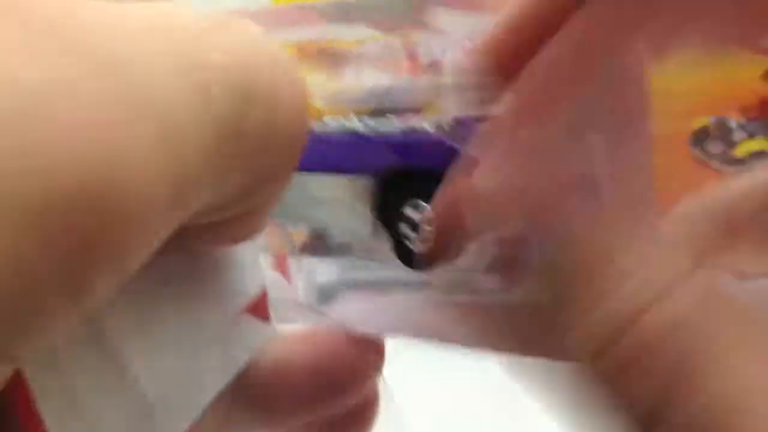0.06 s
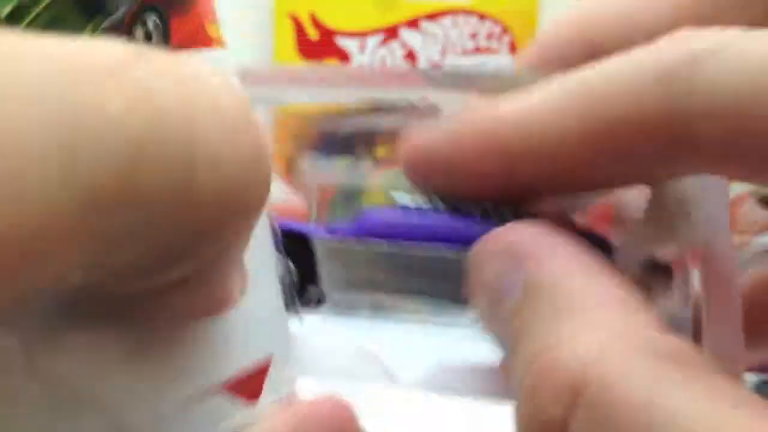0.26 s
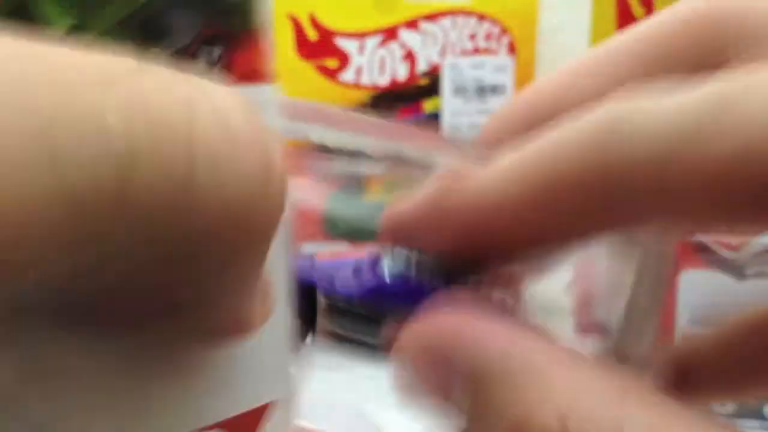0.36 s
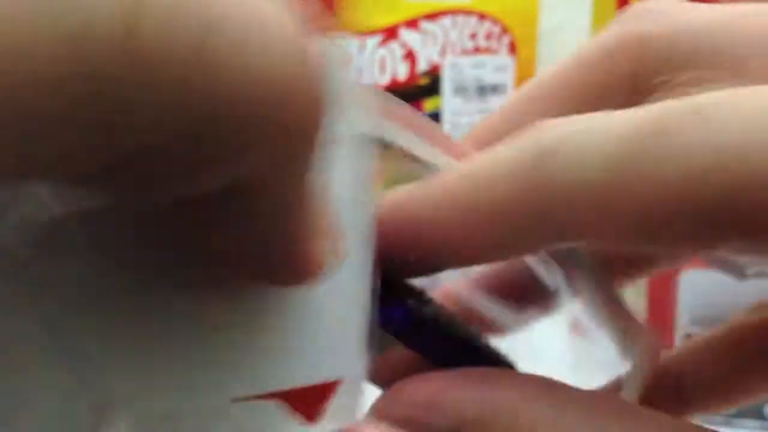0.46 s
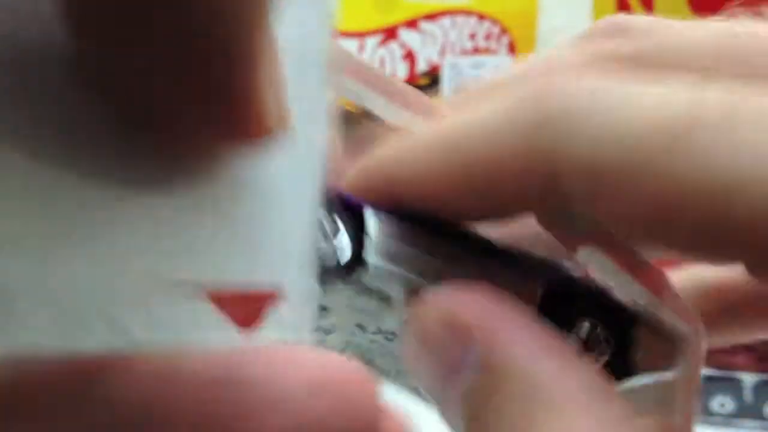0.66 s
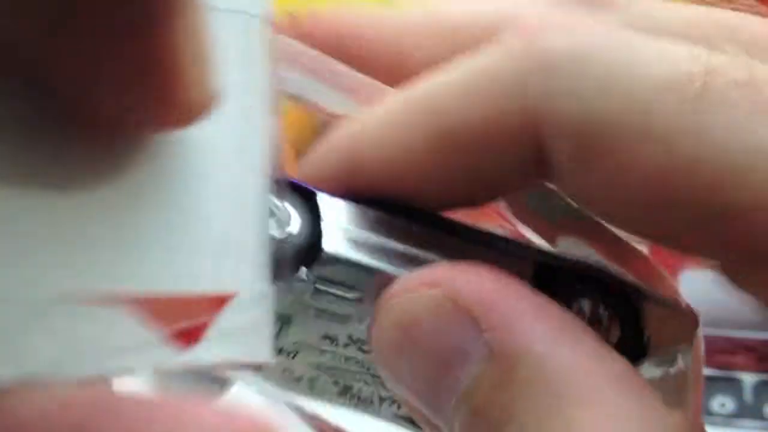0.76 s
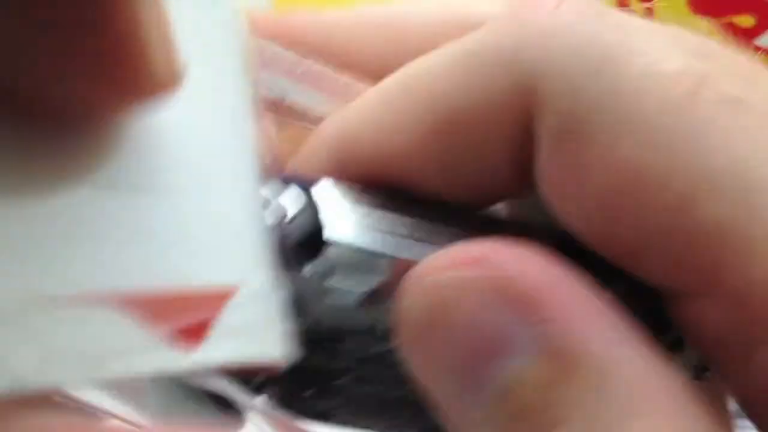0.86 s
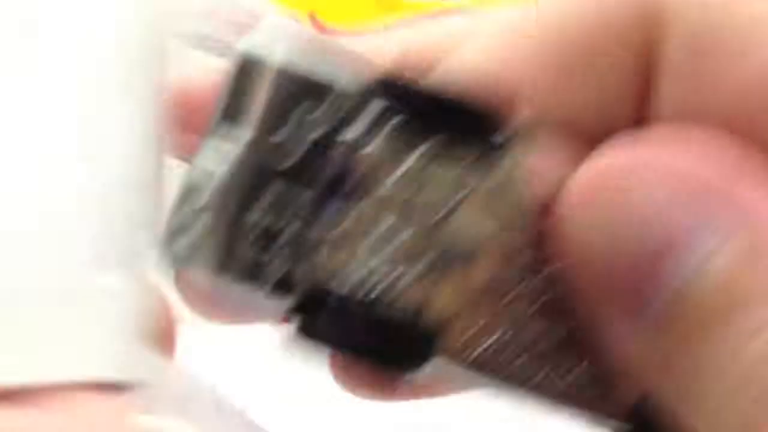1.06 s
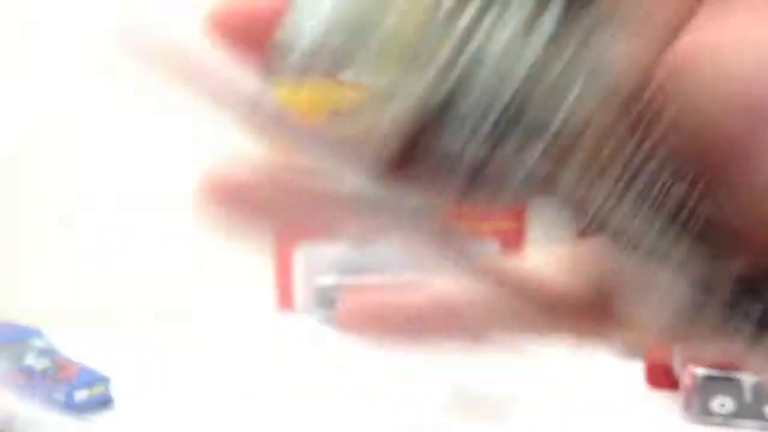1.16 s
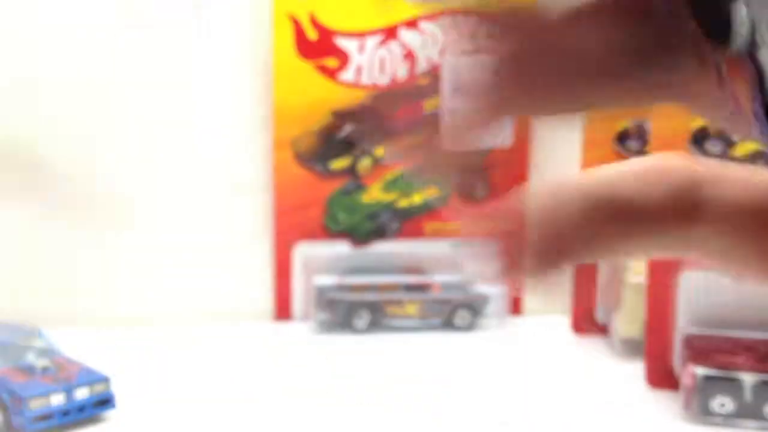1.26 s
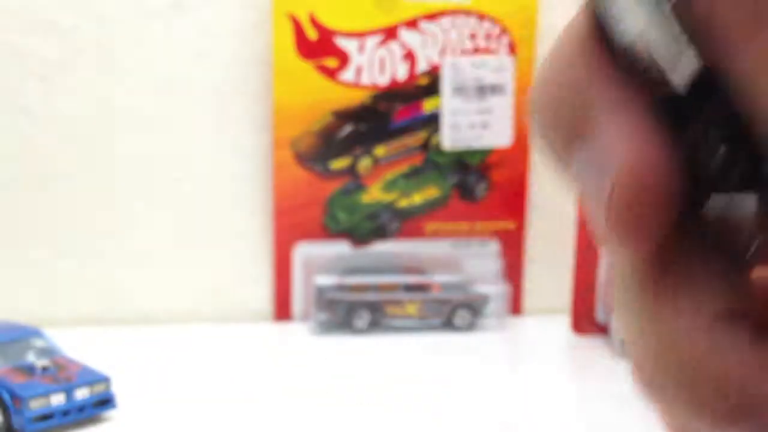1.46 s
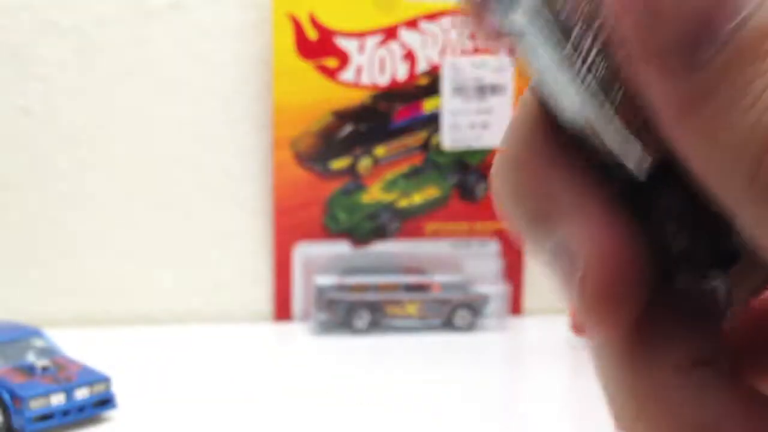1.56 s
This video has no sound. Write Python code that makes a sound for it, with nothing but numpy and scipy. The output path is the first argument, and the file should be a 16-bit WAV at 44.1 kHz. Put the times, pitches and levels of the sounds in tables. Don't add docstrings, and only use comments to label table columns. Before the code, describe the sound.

A stiff plastic blister pack crackles and snaps in someone's hands, card and film scraping and tearing, then the toy car inside ticks lightly with a thin metallic ring; close microphone, small quiet room.

```python
import sys
import numpy as np
from scipy import signal
from scipy.fft import rfft, irfft, next_fast_len
from scipy.io import wavfile
from scipy.ndimage import map_coordinates

SR = 44100
rng = np.random.default_rng(int(sys.argv[2]) if len(sys.argv) > 2 else 0)


def unload_wav(signal):
    wavfile.write(
        sys.argv[1],
        SR,
        np.round(np.clip(np.atleast_2d(signal).T, -1, 1) * 32767).astype(np.int16),
    )


def linear_from_db(decibels):
    return 10 ** (np.asarray(decibels, float) / 20)


N = 70560

# start_s, peak_db, pitch_hz, t60_s (time to fade by 60 dB)
WALL_POPS = [(.024, -34.5, 1390, 0.023), (.186, -24, 1274, 0.024), (0.2383, -13.5, 945, 0.01),
             (.243, -29, 960, 0.0057), (0.302, -23.5, 1685, 0.013), (.382, -20, 1294, 0.0076),
             (0.3816, -25, 2870, 0.0094), (.384, -23.5, 2110, 0.012), (0.3991, -18, 613, 0.015),
             (.473, -5, 1420, 0.0066), (.546, -18.5, 1487, 0.016), (0.548, -24.5, 1110, 0.015),
             (0.4751, -23, 1080, 0.013), (0.6503, -26, 1130, 0.011), (.574, -33, 1470, 0.017),
             (.580, -13, 2120, 0.0046), (0.639, -29.5, 588, 0.033), (.650, -16, 1450, 0.011),
             (0.722, -44, 1030, 0.01), (0.9752, -26.5, 1405, 0.013), (0.9755, -14.5, 720, 0.01),
             (.9768, -11.5, 1080, 0.009), (0.9772, -9, 1325, 0.01), (0.994, -19.5, 1100, 0.0067),
             (0.998, -24.5, 1910, 0.0097), (0.3997, -13, 1470, 0.0077), (1.036, -27, 1134, 0.021),
             (1.0505, -14, 1393, 0.013), (1.059, 0.5, 1740, 0.003), (1.063, -21.5, 1300, 0.01),
             (1.076, -31, 1550, 0.011), (1.092, -30, 1400, 0.012), (1.1092, -26, 726, 0.0088),
             (1.116, -26, 1930, 0.0083), (1.119, -21, 986, .01), (1.1245, -21, 655, 0.0077),
             (1.129, -19.5, 474, .012), (1.135, -25, 910, 0.0073), (1.171, -20, 967, .015),
             (1.46, -14.5, 1200, 0.0033), (1.4985, -26, 2090, 0.008), (1.144, -26, 1800, 0.013)]
# start_s, peak_db, crack_db, crack_t60_s, panel_rise_s
HARD_SNAPS = [
    (0.2487, -4.5, 1, 0.0075, 0.00086),
    (0.4247, -0.5, -5, 0.0096, 0.0016),
    (1.1608, -21, 2, 0.017, 0.0031),
]
# pitch_hz, level_db, t60_s
SNAP_PANELS = [
    [(893, -2, 0.015), (1080, -10.5, 0.02), (1960, -6.5, 0.021), (2113, 0.5, 0.011), (3890, 3, 0.009),
     (4120, 11.5, 0.0055), (5480, 7, 0.0044), (6870, 0.5, 0.0051)],
    [(454, -29, 0.025), (590, -19, 0.02), (659, -8.5, 0.016), (1080, -11, 0.0062), (1300, 4.5, 0.0081),
     (1550, -7, 0.012), (1910, -9, 0.013), (2205, 7.5, 0.0086), (3330, -1, 0.0072), (4700, 9.5, 0.0035),
     (6700, -6, 0.0041)],
    [(566, 13, 0.021), (720, 8.5, 0.038), (986, 7.5, 0.058), (1493, 3, 0.03), (1910, 5.5, 0.033),
     (2473, -4.5, 0.036)],
]
# start_s, peak_db, pitch_hz, t60_s
CARD_THUMPS = [
    (1.119, -26.5, 172, 0.021),
    (1.165, -35.5, 199, 0.064),
    (0.54, -66, 277, 0.13),
    (0.067, -49, 340, 0.017),
    (1.128, -31, 320, 0.018),
    (.055, -54.5, 270, 0.058),
]
# start_s, peak_db, centre_hz, t60_s
TOY_TICKS = [(.047, -28, 5740, 0.16), (0.15, -27.5, 4950, 0.013), (.167, -21.5, 5560, 0.0069),
             (0.22, -23, 4840, 0.06), (0.682, -33, 4530, 0.073), (0.884, -39, 5860, 0.0053),
             (0.895, -30, 9000, 0.006), (1.017, -24, 11500, 0.018), (1.1731, -14.5, 6660, 0.0069),
             (1.1737, -28, 2600, 0.017), (1.0439, -17.5, 4060, .014), (1.051, -12.5, 3900, 0.041),
             (1.0541, -11, 7740, 0.011), (1.059, -14, 4870, 0.011), (1.0738, -30, 7000, 0.011),
             (1.0814, -17, 5500, .01), (1.084, -27.5, 5540, 0.0055), (1.087, -18.5, 6000, .012),
             (1.110, -19, 3200, 0.011), (1.1195, -26, 3000, 0.007), (1.1265, -29, 4520, 0.006),
             (1.129, -20, 5500, 0.0066), (.9905, -24, 3900, 0.0067), (0.607, -33, 4600, 0.014),
             (1.2528, -13.5, 3140, 0.037), (1.33, -17, 6200, 0.096), (1.33, -30, 2500, 0.059),
             (1.460, -33.5, 11400, 0.011), (1.4995, -23, 6980, 0.015), (1.4985, -26, 2730, 0.037),
             (1.507, -33, 11000, .02), (1.2523, -17, 9260, 0.053), (1.161, -11.5, 6700, 0.0088)]
# start_s, peak_db, centre_hz, t60_s
SOFT_SCUFFS = [
    (1.391, -23, 4000, 0.029),
    (1.4, -21, 3300, 0.022),
    (1.523, -22.5, 9500, 0.053),
    (1.565, -36, 12000, .04),
    (1.576, -30.5, 8500, 0.044),
    (.575, -46, 7000, 0.055),
    (0.59, -34, 8000, 0.051),
    (.612, -27, 6850, .04),
    (1.461, -29.5, 4000, 0.048),
]
# time_s, effort_db, brightness_db
HAND_RUBBING = [(0.0, -57.5, 0.5), (0.164, -58, 9), (0.368, -49.5, 10), (0.431, -44.5, 6.5),
                (0.516, -51, -2.5), (0.658, -53, -0.5), (0.918, -63.5, -3.5), (1.076, -40.5, 7.5),
                (1.14, -82, -15), (1.43, -68, 9.5), (1.6, -59.5, 5)]
# start_s, rise_s, fall_s, level_db, brightness_db
TEAR_STROKES = [(0.019, 0.014, 0.13, -51.5, 5), (0.138, 0.058, 0.097, -39, 3),
                (0.441, 0.045, 0.021, -44.5, 9), (0.572, 0.006, 0.023, -37.5, -1),
                (0.581, 0.024, 0.011, -38, 3), (0.919, 0.035, 0.1, -48, 14),
                (1.027, 0.026, 0.012, -37.5, 8), (1.062, 0.061, 0.06, -63.5, 26.5),
                (1.103, 0.022, 0.028, -30, 1), (1.138, 0.012, 0.012, -46.5, 10),
                (1.51, 0.023, 0.017, -49, -24), (0.837, 0.018, 0.12, -55, 1.5),
                (0.889, 0.031, 0.04, -64, 18), (1.497, 0.0036, 0.057, -43.5, -18)]
# frequency_hz, level_db (per Hz)
CARD_COLOUR = [(53, -19), (90, -18), (209, 3.5), (947, 6.5), (1920, 6), (2730, -0.5), (3020, -4.5),
               (5000, -2.5), (6500, -72), (11000, -120)]
# frequency_hz, level_db (per Hz)
FILM_COLOUR = [(1470, -90), (2500, -1), (6640, -1.5), (7510, 1), (8610, -5), (13900, 0.5), (15500, -20)]
# start_s, peak_db, other_pitches_db (change of pitches far from the main one)
AXLE_STRIKES = [
    (0.484, -31, -5),
    (1.066, -52, 26.5),
    (1.086, -50, 16),
    (1.147, -36, 6),
    (1.253, -43, -22),
    (1.3311, -15.5, -13.5),
    (1.391, -58, 9.5),
]
# pitch_hz, level_db, t60_s
AXLE_MODES = [(11322, 0, .062), (11380, 0, .06), (11240, -19, .19), (11310, -21, .19), (10090, -14, .15),
              (10150, -14, .12), (10030, -20, .15), (14000, -14, .08), (14110, -15, .07)]
# start_s, level_db
BODY_KNOCKS = [
    (1.253, -39),
    (1.33, -46),
    (1.391, -52),
]
# pitch_hz, level_db, t60_s
BODY_MODES = [(4700, -9.5, 0.18), (4870, -2.5, 0.12), (2090, 4.5, 0.045), (1400, -2, 0.048)]
# frequency_hz, t60_s
ROOM_FADE = [(200, 0.46), (1500, 0.39), (5000, 0.23), (12000, 0.18)]
# frequency_hz, level_db (per Hz)
HISS_COLOUR = [(24, -34), (40, 18), (266, 9), (817, -16), (1050, -19), (2390, -13), (3650, -5),
               (12400, -9.5), (15500, -26)]

SHORT = np.arange(SR // 10) / SR


def unit(x):
    return x / np.sqrt(np.mean(x ** 2) + 1e-20)


def along(points, hz):
    f, v = np.transpose(points)
    return np.interp(np.log(hz + 1), np.log(f + 1), v)


def wobble(rate):
    knots = rng.standard_normal(int(N * rate / SR) + 4)
    return map_coordinates(knots, [np.arange(N) * rate / SR])


def filtered(x, response):
    m = next_fast_len(x.shape[-1] + 8192)
    gain = response(np.fft.rfftfreq(m, 1 / SR))
    return irfft(rfft(x, m) * gain, m)[..., :x.shape[-1]]


def high(f, hz):
    return -f * f / (hz * hz - f * f + 1.3j * f * hz)


def add(out, start_s, x):
    part = out[round(start_s * SR):][:len(x)]
    part += x[:len(part)]


def noise():
    return rng.standard_normal(len(SHORT))


def mode(t, hz, db, t60, rise):
    fade = linear_from_db(db - 60 * t / t60)
    return fade * (1 - np.exp(-t / rise)) * np.sin(2 * np.pi * hz * t)


def pops():
    out = np.zeros(N)
    for start, db, hz, life in WALL_POPS:
        t60 = min(life, 0.018)
        pop = 0
        for ratio, level_db in [(1, 0), (0.571, -13.5), (1.423, -12.5)]:
            pop = pop + mode(SHORT, hz * ratio, level_db, t60, rise=0.0026)
        add(out, start, linear_from_db(db + 6) * pop)
    return out


def snaps():
    out, t = np.zeros(N), SHORT
    for (start, db, crack_db, crack_t60, rise), panel in zip(HARD_SNAPS, SNAP_PANELS):
        burst = filtered(noise(), lambda f: high(f, 1700) / (1 + 1j * f / 6000))
        crack = linear_from_db(crack_db - 60 * t / crack_t60) * burst
        ring = sum(mode(t, hz, level, min(life, 0.03), rise) for hz, level, life in panel)
        shocks = linear_from_db(-29 - 60 * t / 0.03) * noise()
        shaken = signal.fftconvolve(ring, shocks)[:len(t)]
        scatter = unit(filtered(noise(), lambda f: high(f, 500) ** 2 / (1 + 1j * f / 2500)))
        wake = linear_from_db(-25.5 - 60 * t / 0.19) * scatter * (1 - t / t[-1])
        add(out, start, linear_from_db(db) * (crack + wake + ring + shaken))
    return out


def thumps():
    out = np.zeros(N)
    for start, db, hz, t60 in CARD_THUMPS:
        add(out, start, mode(SHORT, hz, db + 8.5, t60, rise=0.0026))
    return out


def contact(shape, centre_hz):
    width_hz = 1.2 * centre_hz

    def resonance(f):
        floor = high(f, 1400) ** 2
        roof = np.sqrt(1 + (f / 1.9 / centre_hz) ** 6)
        return floor / roof * 1j * f * width_hz / (centre_hz ** 2 - f * f + 1j * f * width_hz)

    return filtered(shape * noise(), resonance)


def ticks():
    out = np.zeros(N)
    for start, db, hz, t60 in TOY_TICKS:
        shape = 0.3 * linear_from_db(-60 * SHORT / t60) + 0.55 * linear_from_db(-60 * SHORT / 0.004)
        add(out, start, linear_from_db(db) * contact(shape, hz))
    return out


def scuffs():
    out = np.zeros(N)
    for start, db, hz, t60 in SOFT_SCUFFS:
        shape = 0.3 * linear_from_db(-60 * SHORT / t60) * (1 - np.exp(-SHORT / 0.0018))
        add(out, start, linear_from_db(db) * contact(shape, hz))
    return out


def grit(spectrum, centre_hz):
    rate, cycles, spread = 6000, 5, 0.7
    draw = rng.random((int(rate * N / SR), 2))
    hz = centre_hz * np.exp(spread * rng.standard_normal(len(draw)))
    hz = np.clip(hz, 100, 15000)[:, None]
    size = linear_from_db(np.minimum(-4.5 * np.log(draw[:, 1:] + 1e-9), 11))
    k = np.arange(200)
    fade = np.exp(-2 * hz * k / SR / cycles)
    grains = size * np.sqrt(hz) * fade * np.sin(2 * np.pi * hz * k / SR)
    places = (draw[:, :1] * N).astype(int) + k
    breaks = np.bincount(places.ravel(), grains.ravel(), N + 256)[:N]

    def flatten(f):
        hump = np.log((f + 1) / centre_hz) ** 2 / (4 * spread ** 2)
        return np.sqrt(f / centre_hz) * np.exp(np.minimum(hump, 1))

    x = unit(filtered(breaks, flatten)) + 0.8 * rng.standard_normal(N)
    return unit(filtered(x, lambda f: linear_from_db(along(spectrum, f))))


def friction():
    t = np.arange(N) / SR
    s, effort_db, bright_db = np.transpose(HAND_RUBBING)
    dull = linear_from_db(np.interp(t, s, effort_db))
    bright = dull * linear_from_db(np.interp(t, s, bright_db))
    for start, rise, fall, db, tilt_db in TEAR_STROKES:
        u = t - start
        swell = np.clip(u / rise, 0, 1) ** 1.36
        fade = np.exp(-3 * np.clip(u - rise, 0, 1) / fall)
        stroke = linear_from_db(db) * np.where(u < rise, swell, fade)
        dull = dull + stroke
        bright = bright + stroke * linear_from_db(tilt_db)
    shared_db = 2.8 * wobble(61.29) + 0.7 * wobble(200)
    card = dull * linear_from_db(shared_db + 0.81 * wobble(92.27)) * grit(CARD_COLOUR, centre_hz=1200)
    film = bright * linear_from_db(-6 + shared_db + 0.29 * wobble(120)) * grit(FILM_COLOUR, centre_hz=6770)
    return card + film


def axle():
    out, t = np.zeros(N), np.arange(SR // 4) / SR
    main_hz = AXLE_MODES[0][0]
    for start, db, other_db in AXLE_STRIKES:
        ring = 0
        for k, (hz, level, t60) in enumerate(AXLE_MODES):
            level = level + other_db * (abs(hz - main_hz) > 500)
            ring = ring + (-1) ** k * mode(t, hz, level, t60, rise=0.004)
        add(out, start, linear_from_db(db) * ring)
    return out


def metal_body():
    out, t = np.zeros(N), np.arange(SR // 4) / SR
    for start, db in BODY_KNOCKS:
        ring = sum(mode(t, hz, level, t60, rise=0.00081) for hz, level, t60 in BODY_MODES)
        add(out, start, linear_from_db(db) * ring)
    return out


def room(x):
    hz, t, z = signal.stft(rng.standard_normal(SR // 2), SR, nperseg=256)
    fade = linear_from_db(-60 * t / along(ROOM_FADE, hz)[:, None])
    tail = signal.istft(z * fade, SR, nperseg=256)[1]
    delayed = np.pad(x, (40, 0))
    return signal.fftconvolve(delayed, tail / np.linalg.norm(tail))[:N]


def room_tone():
    drift_db = 0.61 * wobble(10.56)
    hiss = unit(filtered(rng.standard_normal(N), lambda f: linear_from_db(along(HISS_COLOUR, f))))
    return linear_from_db(-64.5 + drift_db) * hiss


def scene():
    grains = friction() + ticks() + scuffs()
    bodies = pops() + snaps() + thumps()
    metal = axle() + metal_body()
    echo = room(grains + linear_from_db(-10) * bodies)
    return (grains + bodies + metal + linear_from_db(-11.5) * echo + room_tone())[None]


def top_cut(x):
    return signal.sosfilt(signal.butter(12, 16030, fs=SR, output="sos"), x)


def record(dry):
    def microphone(f):
        bass_cut = high(f, 165) * high(f, 165 / 2)
        return bass_cut / np.sqrt(1 + (f / 15250) ** 150)

    x = filtered(dry, microphone)
    mix = x / (1 + np.abs(x / 1.05) ** 8) ** (1 / 8)
    return top_cut(mix)


dry = scene()
out = record(dry)
unload_wav(out)
```